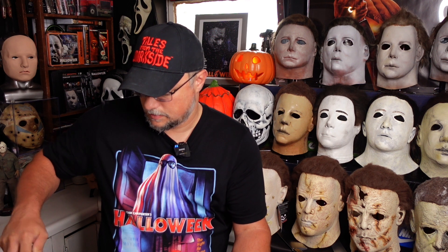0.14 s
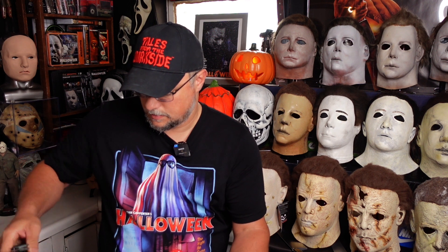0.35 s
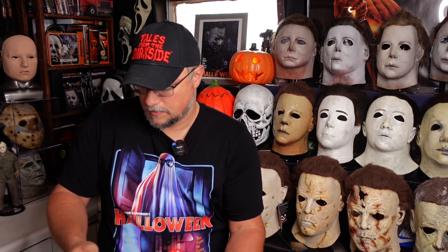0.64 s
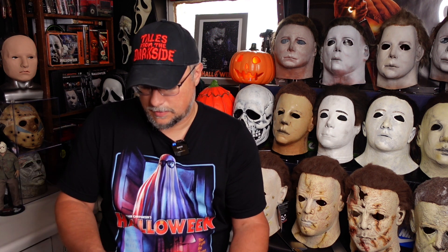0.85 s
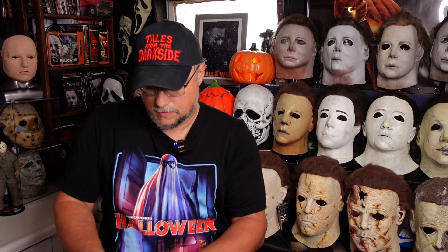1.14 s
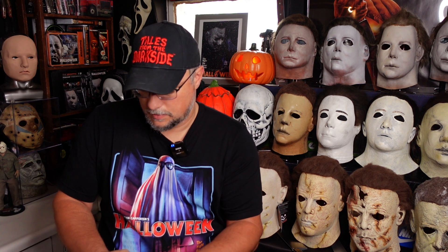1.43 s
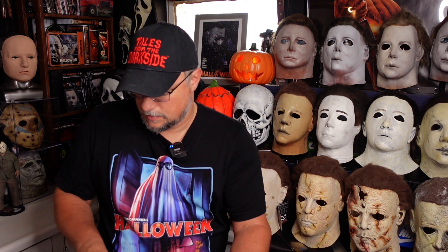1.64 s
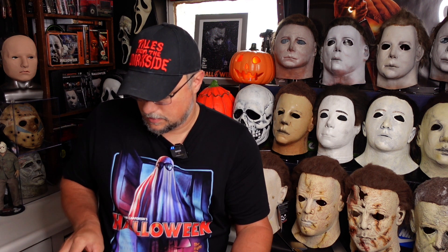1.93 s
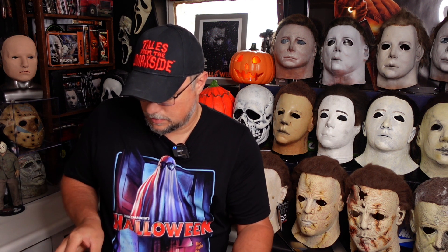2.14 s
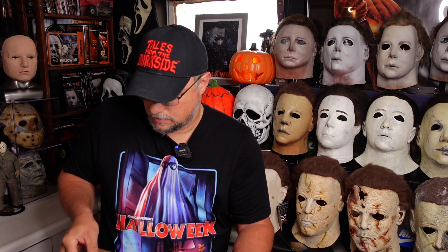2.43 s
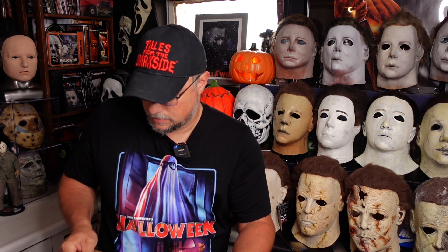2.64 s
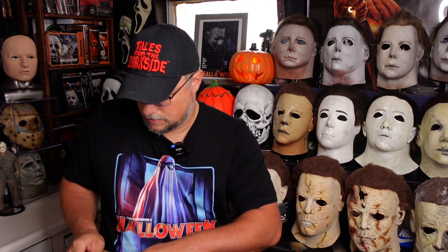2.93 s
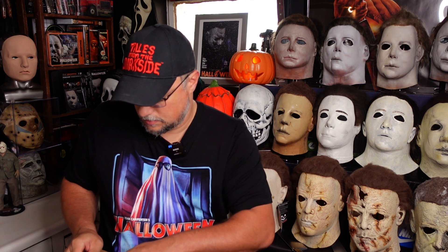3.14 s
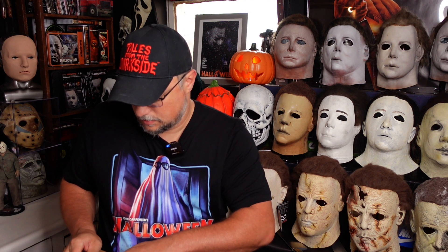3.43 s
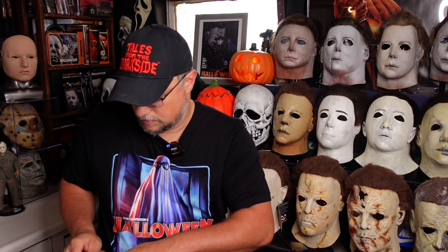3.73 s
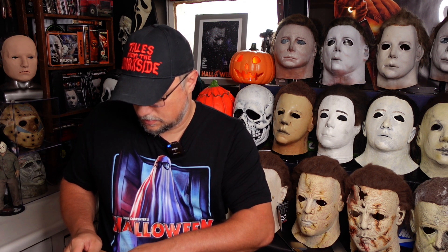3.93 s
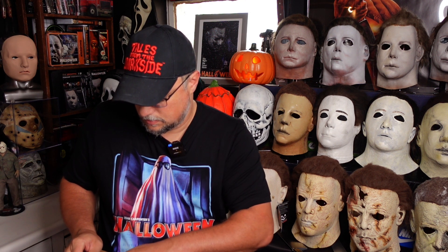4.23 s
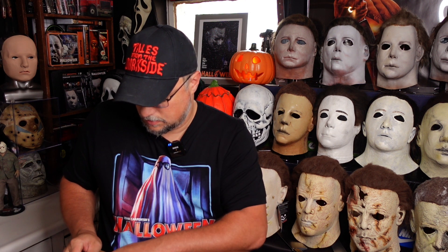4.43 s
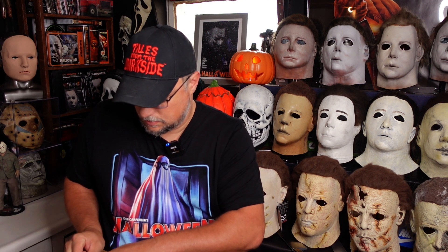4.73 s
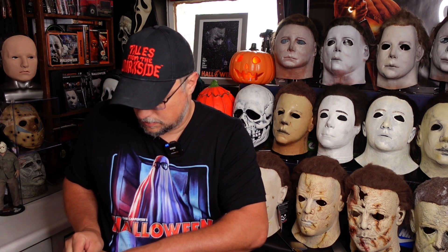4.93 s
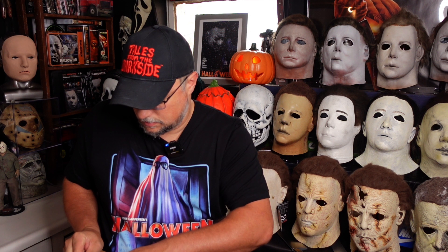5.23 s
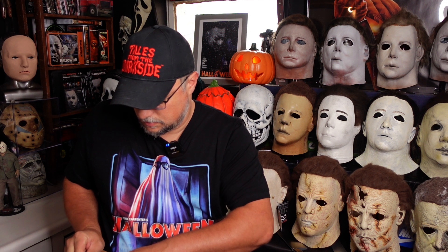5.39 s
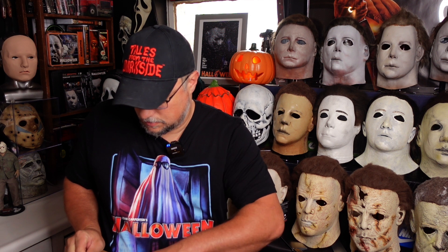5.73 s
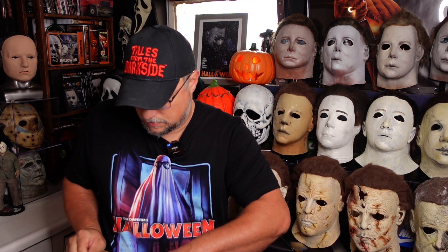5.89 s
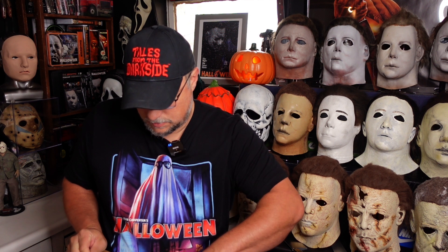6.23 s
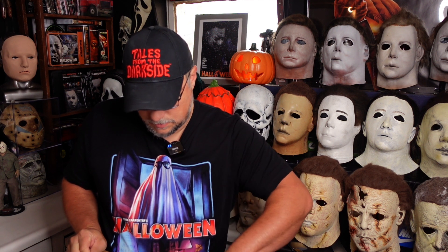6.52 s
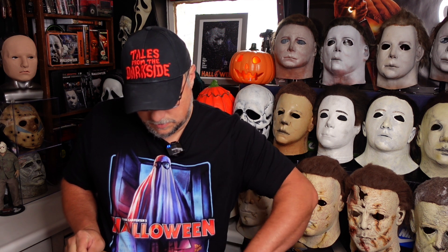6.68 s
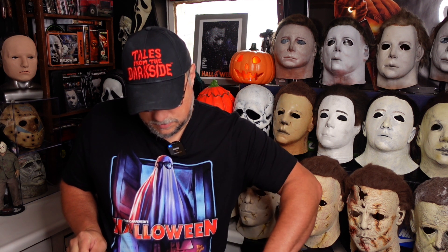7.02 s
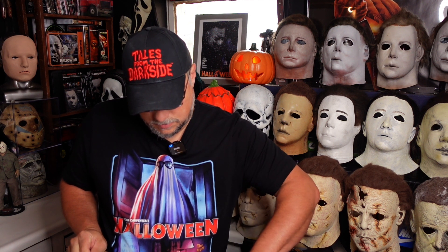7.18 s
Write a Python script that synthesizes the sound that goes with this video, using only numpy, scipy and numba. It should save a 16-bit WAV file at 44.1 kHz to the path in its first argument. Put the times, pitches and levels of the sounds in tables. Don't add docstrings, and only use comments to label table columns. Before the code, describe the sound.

Cardboard rustles and slides under fingers, with scattered knocks and clicks, a quieter lull midway, then louder creaking, crumpling and hard flap raps.

```python
import sys
import numpy as np
from scipy import signal
from scipy.fft import rfft, irfft
from scipy.io import wavfile
from scipy.ndimage import uniform_filter1d
from numba import njit

SR = 44100
rng = np.random.default_rng(int(sys.argv[2]) if len(sys.argv) > 2 else 0)


def digitize_waveform(pressure):
    field = np.atleast_2d(pressure).T
    bounded = np.clip(field, -1, 1)
    quanta = np.round(bounded * 32767).astype(np.int16)
    wavfile.write(sys.argv[1], SR, quanta)


def gain_from_decibels(decibels):
    exponent = np.asarray(decibels, float) / 20
    return 10 ** exponent


N = 324135
T = np.arange(N) / SR

# [f/Hz, width/Hz, level/dB]
BODY_MODES = [(140, 99, -10.5), (203.5, 57, -2.5), (263.3, 32, 2.5), (320, 30, -3.5), (400.7, 41, 3),
              (491.7, 63, 2.5), (650, 138, -4)]
# [f/Hz, width/Hz, level/dB]
PANEL_MODES = [(919, 83, -4), (1132, 172, 0.5), (1292, 109, 2.5), (1425, 122, 3), (1700, 393, -3),
               (2525, 606, -13)]


def unit(x):
    return x / np.sqrt(np.mean(x ** 2))


def colour(x, points):
    hz, db = np.transpose(points)
    log_f = np.log(np.arange(len(x) // 2 + 1) * SR / len(x) + 1)
    return irfft(rfft(x) * gain_from_decibels(np.interp(log_f, np.log(hz), db)), len(x))


@njit
def svf(x, hz, width):
    y, band, low = np.empty(len(x)), 0., 0.
    for i in range(len(x)):
        g = np.tan(np.pi * hz[i] / SR)
        k = width / hz[i]
        v = (band + g * (x[i] - low)) / (1 + g * (g + k))
        band = 2 * v - band
        low = low + 2 * g * v
        y[i] = k * v
    return y


def svf_twice(x, hz, width):
    return svf(svf(x, hz, width), hz, width)


def ring(x, modes, bend):
    total = 0
    for k, (hz, width, db) in enumerate(modes):
        total = total + (-1) ** k * gain_from_decibels(db) * svf(x, hz * bend, 1. * width)
    return total


def walk(rate):
    hold = int(SR / rate)
    steps = np.repeat(rng.standard_normal(N // hold + 1), hold)
    return 1.415 * uniform_filter1d(uniform_filter1d(steps, hold), hold)[:N]


def grains(rate, spread_db, smooth_db):
    size_db = spread_db * np.minimum(rng.exponential(size=N), 3)
    catch = (rng.random(N) < rate / SR) * gain_from_decibels(size_db) * rng.standard_normal(N)
    return unit(catch) + gain_from_decibels(smooth_db) * rng.standard_normal(N)


def curves(table):
    s, *columns = np.transpose(table)
    return (np.interp(T, s, c) for c in columns)


def strokes(table):
    drop_db = 20
    roundness = 1.75
    power = np.zeros((2, N))
    for s, rise, fall, *db in table:
        away = np.where(T < s, (s - T) / rise, (T - s) / fall)
        power += gain_from_decibels(np.array(db)[:, None] - drop_db * away ** roundness) ** 2
    return np.sqrt(power)


def add(out, s, sound, peak_db):
    i = int(s * SR)
    out[i:i + len(sound)] += (sound * gain_from_decibels(peak_db) / np.max(np.abs(sound)))[:N - i]


def fade(t, t60):
    return np.exp(-np.log(1000) * t / t60)


def burst(t, chance, hz, width, t60):
    return svf_twice(chance * fade(t, t60), np.full(len(t), 1. * hz), 1. * width)


def rubbing():
    # [strongest t/s, rise/s, fall/s, body/dB, panel/dB]
    rubs = [(.14, 0.022, 0.097, -58.5, -68), (.34, 0.049, 0.51, -66.5, -67.5),
            (.73, .03, 0.2, -53, -73), (.82, 0.093, 0.19, -54.5, -55),
            (1.71, 0.25, 0.22, -53, -49.5), (2.02, 0.19, 0.077, -52.5, -58),
            (2.39, 0.31, 0.22, -54.5, -64), (2.51, 0.19, 0.047, -49, -50),
            (2.72, 0.26, 0.24, -49.5, -58), (2.94, 0.082, 0.13, -58.5, -60.5),
            (3.17, 0.045, 0.42, -60, -68.5), (3.42, 0.46, 0.079, -67, -74),
            (3.74, 0.16, 0.066, -70, -67), (3.845, 0.046, 0.1, -61, -69),
            (4.03, 0.01, 0.067, -52, -66),
            (4.26, 0.021, 0.16, -51, -59), (4.345, 0.028, 0.23, -42.5, -44.5),
                      (4.541, 0.28, 0.073, -46, -47), (4.641, 0.012, 0.084, -43.5, -46.5),
                      (4.74, .08, .07, -51, -55.5), (4.884, 0.13, 0.09, -43, -53.5),
                      (5.15, 0.28, 0.23, -57, -61), (5.288, 0.025, 0.08, -46, -53),
                      (5.504, 0.027, 0.04, -39, -43.5), (5.65, 0.3, 0.39, -52, -53.5),
                      (5.78, 0.1, 0.12, -46.5, -51.5), (5.95, 0.25, 0.3, -52, -51.5),
                      (6.055, 0.12, 0.043, -43, -40.5), (6.242, 0.31, 0.08, -42, -48),
                      (6.42, 0.11, 0.2, -39, -42), (6.54, 0.17, 0.054, -44, -43.5),
                      (6.76, 0.34, 0.1, -44.5, -46.5), (6.9, 0.18, 0.1, -42.5, -49.5),
                      (7.125, 0.04, 0.11, -52, -51), (7.265, 0.05, 0.06, -53, -54)]
    # [t/s, half length/s, body/dB, panel/dB]
    crumples = [
        (0.992, 0.025, -49.5, -56),
        (2.402, 0.0068, -38, -49),
        (4.37, 0.0062, -43.5, -38),
        (4.664, 0.0082, -43, -43.5),
        (5.628, 0.0059, -37.5, -38.5),
        (5.783, 0.0084, -36, -38.5),
        (6.054, 0.015, -37, -51),
        (6.233, 0.01, -32.5, -49),
        (6.759, 0.012, -32.5, -44),
    ]
    # [strongest t/s, rise/s, fall/s,
    # coarse/dB, fine/dB]
    slides = [(.12, 0.016, 0.034, -54.5, -65), (.34, 0.017, 0.46, -60.5, -67),
              (.5, 0.23, 0.067, -56.5, -67), (.78, 0.063, 0.23, -50.5, -54),
              (.95, .2, 0.27, -58.5, -68.5), (1.267, 0.1, 0.059, -61, -74),
              (1.475, 0.12, 0.044, -52.5, -63.5), (1.62, 0.14, 0.25, -53, -53),
              (1.7, 0.18, 0.16, -40.5, -47), (2.05, 1, 0.41, -58.5, -63.5),
              (2.395, 0.12, 0.16, -51, -54.5), (2.495, 0.074, 0.038, -48, -60),
              (2.714, 0.15, 0.12, -48, -54.5), (2.96, 0.15, 0.053, -52, -63),
              (3.42, 0.68, 0.14, -72, -73), (3.77, 0.17, 0.089, -68.5, -71),
              (3.87, 0.034, 0.035, -59, -61), (4.045, 0.016, 0.049, -63, -63),
              (4.27, 0.036, .2, -55.5, -57), (4.345, 0.027, 0.15, -44, -45),
                        (4.53, 0.21, 0.063, -42, -47), (4.641, 0.017, 0.17, -50, -52.5),
                        (4.876, 0.053, 0.017, -38, -48), (4.93, 0.075, 0.085, -57.5, -63),
                        (5.02, 0.055, 0.22, -58.5, -68), (5.14, 0.19, 0.056, -55, -53),
                        (5.34, 0.17, 0.04, -68, -60), (5.517, 0.045, 0.091, -51, -53.5),
                        (5.63, 0.032, 0.33, -51, -53.5), (5.79, 0.22, 0.049, -48, -45.5),
                        (6.05, 0.28, 0.11, -47.5, -48.5), (6.225, 0.14, 0.079, -45.5, -51),
                        (6.4, 0.072, 0.45, -53, -48.5), (6.74, 0.82, 0.13, -49.5, -50.5),
                        (6.91, 0.34, 0.13, -56.5, -66), (7.105, 0.013, 0.069, -56, -63),
                        (7.255, 0.094, 0.11, -68, -66.5)]
    # [t/s, speed/0-1, gap whistle f/Hz, groove whistle f/Hz]
    finger_speed = [(0, 0.94, 8400, 5300), (.45, 0.9, 8200, 5060), (.8, 0.85, 8140, 5200),
                    (1.27, 0.76, 8800, 5040), (1.5, 1, 8600, 5200), (2.9, 0.75, 8100, 5040),
                    (3.4, 0.66, 7300, 4800), (4.3, 0.55, 7060, 4550), (4.55, 0.49, 7240, 5350),
                    (4.85, 0.67, 7300, 5250), (5.0, 0.4, 7500, 4900), (5.14, 0.25, 7650, 3720),
                    (5.35, .4, 7500, 3500), (5.75, 0.89, 7360, 5540), (6.1, 0.7, 7860, 5300),
                    (6.36, 0.5, 8300, 5600), (6.8, 0.73, 8540, 5850), (7.35, 0.53, 8200, 5800)]
    # [f/Hz, level/dB]
    paper_colour = [(1500, -3.5), (2600, -11.5), (3250, -9), (4000, -4), (5600, -5.5), (6600, -9.5),
                    (8000, -19), (12000, -24)]
    # [f/Hz, level/dB]
    airy_colour = [(5000, -4.5), (7000, 6), (9000, 6.5), (12000, 0), (15500, -10.5), (16500, -39)]

    body, panel = strokes(rubs)
    body = body + gain_from_decibels(-74.5)
    for s, half_length, body_db, panel_db in crumples:
        squeeze = np.exp(-.5 * ((T - s) / half_length) ** 2)
        body = body + gain_from_decibels(body_db) * squeeze
        panel = panel + gain_from_decibels(panel_db) * squeeze
    coarse, thin = strokes(slides)
    speed, gap_hz, groove_hz = curves(finger_speed)

    bend = 1 + 0.064 * walk(8)
    grip_db = 1.2 * walk(40)
    body_ring = unit(ring(grains(200, 1.15, -0.43), BODY_MODES, bend))
    panel_ring = unit(ring(grains(700, 4, 6), PANEL_MODES, bend))
    body = body * body_ring * gain_from_decibels(1.25 * grip_db + 0.61 * walk(90))
    panel = panel * panel_ring * gain_from_decibels(grip_db + 1.2 * walk(90))

    shear = grains(3400, 2.3, 2.6)
    speed = np.clip(speed, 0, 1)
    gap_hz = gap_hz * (1 + .015 * walk(9))
    groove_hz = groove_hz * (1 + .015 * walk(9))
    gap_patch, airy_patch, groove_patch, paper_patch = [gain_from_decibels(1.8 * walk(rate)) for rate in (14, 18, 22, 26)]
    gap = unit(svf_twice(shear, gap_hz, 1900.0)) * gap_patch
    airy = unit(colour(shear, airy_colour)) * airy_patch
    groove = unit(svf_twice(shear, groove_hz, 2400.0)) * groove_patch
    paper = unit(colour(shear, paper_colour)) * paper_patch
    fine_hiss = (1 - 1.12 * speed) * gap + 0.84 * speed * airy
    coarse_hiss = (0.42 + 0.38 * speed) * paper + (1 - speed) * groove
    hiss = coarse_hiss * coarse * gain_from_decibels(-3.5) + fine_hiss * thin
    return body + panel + hiss * gain_from_decibels(grip_db + 1.0 * walk(120))


def shoves():
    # [strongest t/s, rise/s, fall/s, box air/dB, table top/dB]
    pushes = [(.76, .04, .08, -56, -72), (1.68, 0.015, 0.06, -56, -50), (2.05, 0.32, 0.34, -59.5, -70),
              (2.41, .04, 0.066, -44, -46.5), (2.47, 0.045, .12, -53, -54.5), (2.85, 0.17, 0.13, -53, -65),
              (4.88, 0.03, 0.074, -52, -48.5), (5.295, 0.039, 0.041, -56, -49),
              (5.55, 0.054, 0.093, -59, -69), (5.9, 0.16, 0.36, -45, -66), (6.25, .04, 0.053, -41.5, -46),
              (6.4, 0.072, 0.22, -47, -59), (6.74, 0.084, 0.11, -54, -50), (6.84, 0.074, 0.16, -53, -46),
              (7.17, 0.09, 0.2, -67, -56)]
    # [f/Hz, width/Hz, level/dB]
    air_modes = [(245.5, 38, 0)]
    # [f/Hz, width/Hz, level/dB]
    table_modes = [(138.5, 62, 0)]
    air_gain, table_gain = strokes(pushes)
    push, still = grains(60, 6.0, 0.0), np.ones(N)
    air_hum = unit(ring(push, air_modes, still))
    table_hum = unit(ring(ring(push, table_modes, still), table_modes, still))
    return air_gain * air_hum + table_gain * table_hum


def knocks():
    # [t/s, peak/dB, f/Hz]
    thumps = [(0.1663, -35, 525), (0.2023, -41, 268), (0.7357, -32, 424), (0.756, -46, 103),
              (1.085, -41.5, 560), (1.2556, -46, 520), (1.353, -38.5, 554), (1.365, -39.5, 600),
              (1.6713, -24.5, 250), (1.678, -21.5, 456), (1.6876, -31, 290), (2.146, -42, 514),
              (2.259, -42, 467), (2.5913, -36, 440), (3.009, -43.5, 280), (3.1311, -23, 700),
              (3.722, -39, 517), (3.8156, -41, 418), (3.9558, -39.5, 443), (4.0235, -42.5, 457),
              (4.801, -30, 730), (5.205, -35.5, 286), (5.2939, -18.5, 450), (5.3025, -34, 250),
              (5.4825, -25, 288), (5.8746, -34, 320), (6.1581, -38, 457), (6.354, -30, 325),
              (6.8428, -30.5, 464), (7.009, -43, 520), (7.042, -44, 523)]
    # [t/s, peak/dB, f/Hz, panel peak/dB]
    raps = [(0.1076, -39, 776, -55), (0.1102, -34.5, 178, -45), (0.3295, -50, 500, -46),
            (2.3521, -30.5, 444, -42), (2.462, -26, 420, -25.5), (2.904, -55, 700, -29.5),
            (3.1336, -19, 290, -31), (3.427, -38, 750, -52), (3.5482, -38, 437, -42),
            (3.6926, -37, 490, -40.5), (3.8538, -33.5, 400, -31), (3.9254, -38, 460, -41.5),
            (4.225, -42.5, 690, -45), (4.2814, -40, 460, -34.5), (4.3293, -27, 710, -22.5),
            (4.8732, -17, 310, -22), (4.927, -37.5, 298, -51), (4.9983, -33.5, 654, -33.5),
            (5.224, -43, 274, -40), (5.5336, -31, 195, -30), (5.7172, -37, 322, -30),
            (6.0373, -24, 530, -19.5), (6.0483, -23.5, 523, -11), (6.1473, -20, 507, -16),
            (6.2178, -23.5, 265, -30), (6.2273, -22, 415, -11), (6.2742, -44, 420, -20.5),
            (6.9119, -26, 443, -14.5), (6.948, -38, 454, -29), (6.976, -49, 500, -40)]
    out, t = np.zeros(N), T[:SR // 5]
    still = np.ones(len(t))
    held_modes = [(f, 1.67 * width, db) for f, width, db in PANEL_MODES]
    soft = [(s, db, hz, db - 13) for s, db, hz in thumps]
    for s, db, hz, panel_db in soft + raps:
        chance = rng.standard_normal((2, len(t)))
        cycles = hz * (t + 0.00033 * (1 - np.exp(-t / 0.00042)))
        swing = fade(cycles, 5.0) * (1 - np.exp(-cycles / 0.23))
        blow = -np.sin(2 * np.pi * cycles) * swing
        blow -= swing * blow.sum() / swing.sum()
        add(out, s - .0002, blow, db)
        add(out, s, ring(chance[0] * fade(t, 0.053), BODY_MODES, still), db - 12.0)
        chance[1, 0] = 2.1
        jolt = chance[1] * (fade(t, 0.002) + 0.065 * fade(t, 0.072))
        add(out, s, ring(jolt, held_modes, still), panel_db - 8.0)
        slap_hz = 1314 * (1 + 0.058 * np.tanh(chance[0, 0]))
        add(out, s, np.sin(2 * np.pi * slap_hz * t) * fade(t, 0.013), panel_db - 7.0)
    return out


def snaps():
    # [t/s, peak/dB, f/Hz]
    sharp_snaps = [(0.1194, -46, 5560), (1.011, -38.5, 5500), (1.485, -44, 5300), (2.8218, -25, 5070),
                   (3.854, -22.5, 5740), (4.0443, -42, 5170), (4.3324, -17, 6450), (4.487, -28, 5900),
                   (4.6508, -32, 5660), (4.7159, -39, 5500), (4.819, -35.5, 5530), (4.862, -46, 5730),
                   (4.8688, -31, 5190), (4.8726, -19, 5570), (5.225, -48, 5600), (5.498, -26, 6900),
                   (5.508, -34, 8330), (5.621, -34, 8100), (6.0378, -26.5, 5150), (6.0485, -13.5, 5700),
                   (6.056, -26, 5400), (6.063, -26, 6150), (6.1247, -34, 5400), (6.1478, -13.5, 5500),
                   (6.213, -23, 5540), (6.2276, -16, 5860), (6.2754, -23.5, 5600), (6.9126, -20, 5280),
                   (6.946, -36.5, 6260), (7.147, -44.5, 6040),
                   (0.3305, -56, 4500), (2.637, -46, 5350), (2.9044, -37, 4500), (4.0387, -38.5, 7550),
                (4.0629, -48, 4360), (4.1732, -38.5, 6900), (4.2795, -36, 4700), (4.548, -34, 5740),
                (4.64, -36, 5610), (4.877, -40, 4810), (5.0733, -38, 14400), (5.5942, -36.5, 8000),
                (5.612, -32, 7800), (6.528, -31, 5200)]
    # [t/s, peak/dB]
    ticks = [
        (.6923, -47.5),
        (3.131, -33.5),
        (4.6192, -44),
        (5.2895, -43),
        (5.347, -47),
        (5.4549, -48),
        (5.481, -43),
    ]
    # [t/s, peak/dB, f/Hz]
    peel = [(3.3068, -53, 7120), (3.3464, -44.5, 6980), (3.355, -45.5, 7400), (3.3961, -53, 10800),
            (3.4111, -40, 5150), (3.429, -50, 7340), (3.437, -50, 7500), (3.4624, -54, 7290),
            (3.4753, -43, 7260), (3.484, -52, 7500), (3.551, -56.5, 6800), (3.5921, -58, 7390),
            (3.6221, -57, 7250), (3.667, -54, 7500), (3.6874, -50.5, 7230), (3.718, -54, 7300),
            (3.7278, -49, 6400), (3.7423, -48, 5600), (3.765, -53, 7200), (3.7767, -48, 7250),
            (3.789, -53, 7300), (3.8, -42.5, 7490), (3.816, -44, 6600), (3.8331, -48, 4400)]
    out, t = np.zeros(N), T[:SR // 10]
    rows = [(s, db, 7270, db - 27) for s, db in ticks]
    rows += [(s, db, hz, db - 27) for s, db, hz in sharp_snaps]
    rows += [(s, db, hz, db + 3.5) for s, db, hz in peel]
    for s, db, hz, top_db in rows:
        chance = rng.standard_normal((2, len(t)))
        chance[0, 0] = 2.4
        click = burst(t, chance[0], hz, 0.34 * hz, 0.002)
        click += 0.51 * burst(t, chance[0], 4680, 1030, 0.0015)
        add(out, s, click, db)
        add(out, s + .0017, click, db - 10)
        add(out, s + 0.0071, click, db - 21.0)
        add(out, s, burst(t, chance[0], 11900, 6900, 0.006), top_db - 9.0)
        add(out, s, burst(t, chance[1], hz, 5400, 0.076), db - 18.0)
    return out


def breaks():
    # [t/s, treble peak/dB, middle re
    # treble/dB]
    break_edges = [(0.1136, -47, -0.5), (0.3305, -39, 0.5), (0.6913, -58, -11), (0.7332, -53, -8),
                   (0.7607, -51, -13), (1.0104, -57, -5), (1.3503, -56, 2), (1.3634, -62, 1),
                   (1.4834, -40.5, -7), (2.299, -45.5, -6), (2.395, -29, -14), (2.4574, -38, -9),
                   (2.6374, -44, -14), (2.9045, -37, -15), (3.13, -45, -10), (2.8176, -38, -7),
                   (3.852, -36, -0.5), (4.0382, -42.5, -8), (4.0623, -45, -6), (4.1724, -44, -24),
                        (4.2477, -60, -4), (4.2795, -43, -10), (4.3316, -45, -19), (4.4862, -37, -14),
                        (4.6114, -54, -8), (4.6184, -52, -4), (4.639, -40, -3), (4.7127, -51, -9),
                        (4.804, -42.5, -1), (4.818, -50, -6), (4.8714, -32.5, 11), (4.9297, -51, -10),
                        (5.036, -53, -15), (5.073, -39, -6), (5.244, -51, -15), (5.2873, -52, 8),
                        (5.4146, -58, 2), (5.454, -58, -11), (5.4725, -62, -3), (5.481, -45.5, 2),
                        (5.4996, -40, 5.5), (5.532, -41, -9), (5.5692, -46, 0), (5.5935, -38, -10),
                        (5.611, -34, -9), (5.7177, -35, -6), (5.8706, -48, 1), (6.0372, -31.5, 5.5),
                        (6.048, -19.5, -10), (6.0834, -43, -9), (6.124, -45, 3), (6.147, -24, -6),
                        (6.1574, -46, -5), (6.2125, -47, 4), (6.226, -40, -5), (6.2741, -39, -7),
                        (6.3545, -44, -7), (6.5286, -39, -8), (6.7251, -43, -5), (6.8402, -46, -3),
                        (6.8583, -45, -7), (6.8754, -48, 2), (6.912, -24, -16), (6.9324, -50, 2),
                        (6.9451, -48, 0), (6.974, -55, -8), (7.008, -47, -7), (7.1014, -57, -3),
                        (7.111, -48, -8), (7.1344, -59, -5), (7.232, -63, 3), (7.2614, -52, -10)]
    out, t = np.zeros(N), T[:SR // 50]
    for s, db, middle_db in break_edges:
        chance = rng.standard_normal(len(t))
        chance[0] = 2.4
        hz = 12500 - 170 * (db + 56.0)
        add(out, s + .0006, burst(t, chance, hz, 0.98 * hz, 0.0055), db + 0.54)
        add(out, s + .0006, burst(t, chance, 2340, 2650, 0.0063), db + middle_db + 2.5)
    return out


def pings():
    # [centre t/s, peak/dB, f/Hz, half length/cycles]
    short_tones = [(.1155, -41.5, 800, 2.2), (.331, -35, 2700, 0.49), (.979, -44, 695, 1.3),
                   (2.8187, -15.5, 4970, 1.4), (2.8202, -20.5, 5070, 1.3), (2.82, -40, 1300, 1.2),
                   (3.64, -49.5, 600, 0.69), (4.8696, -25, 330, .6), (5.1965, -45, 800, 0.7),
                   (5.2254, -34.5, 2080, 0.76), (5.504, -34, 1135, 3.5), (5.627, -31, 1204, 4.2),
                   (5.785, -32.5, 1070, 3.6), (6.1486, -9, 1200, 1.1), (6.218, -23, 1380, 0.83),
                   (6.885, -36.5, 1400, 4.1), (7.011, -48, 1400, .8), (7.043, -50, 1450, .8),
                   (7.165, -44, 520, 9), (7.237, -43, 480, 4)]
    out, t = np.zeros(N), T[:SR // 25] - 1 / 50
    for s, db, hz, cycles in short_tones:
        swell = np.exp(-.5 * (hz * t / cycles) ** 2)
        add(out, s - 1 / 50, np.sin(2 * np.pi * hz * t) * swell, db)
    return out


def room(x, t60, wet_db):
    t = T[:SR // 3]
    tail = rng.standard_normal(len(t)) * fade(t, t60) * np.minimum(t / 0.0051, 1)
    tail = colour(tail, [(150, -3.5), (500, 0.5), (3000, -5.5), (12000, -8.0)])
    return x + gain_from_decibels(wet_db) * signal.fftconvolve(x, tail / np.sqrt(np.sum(tail ** 2)))[:N]


def room_tone():
    # [f/Hz, level/dB]
    hiss_colour = [(20, -0.5), (55, -5.5), (200, -7.5), (450, -16), (900, -8.5), (2000, -21), (3200, -19.5),
                   (15200, -24), (16500, -34)]
    # [multiple of 470.6 Hz, level/dB]
    whine_harmonics = [(3, -87), (5, -88), (6, -88), (7, -88), (8, -91), (9, -91), (10, -94), (11, -94),
                       (12, -95)]
    whine = np.zeros(N)
    for k, db in whine_harmonics:
        whine += np.sqrt(2) * gain_from_decibels(db) * np.sin(2 * np.pi * k * 470.6 * T + k * k)
    hiss = unit(colour(rng.standard_normal(N), hiss_colour))
    return hiss * gain_from_decibels(-70 + 0.2 * walk(3.8)) + whine


def scene():
    struck = room(knocks() + snaps() + breaks(), t60=0.094, wet_db=-13.5)
    box = rubbing() + shoves() + pings() + struck
    bass_cut = signal.butter(3, 82, "high", fs=SR, output="sos")
    return (signal.sosfilt(bass_cut, box) + room_tone())[None]


def roll_off(x):
    return signal.sosfilt(signal.butter(12, 15900, fs=SR, output="sos"), x)


def record(dry):
    return roll_off(dry)


dry = scene()
out = record(dry)
digitize_waveform(out)
```